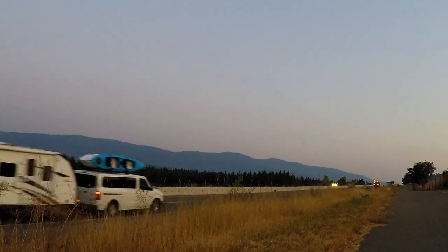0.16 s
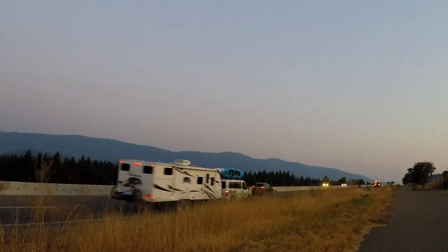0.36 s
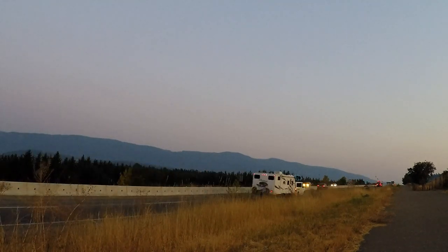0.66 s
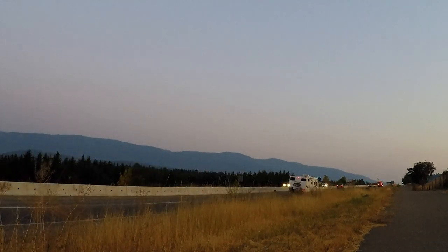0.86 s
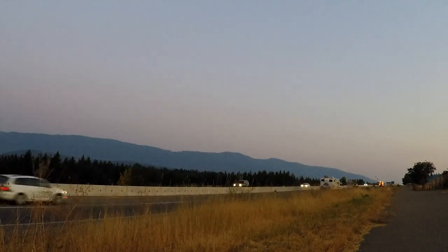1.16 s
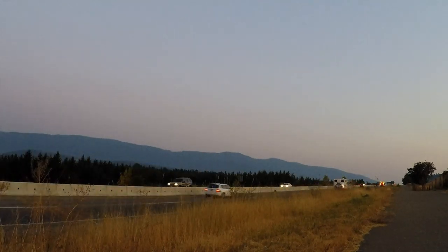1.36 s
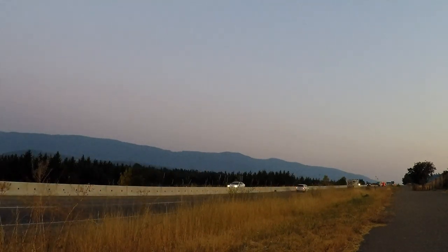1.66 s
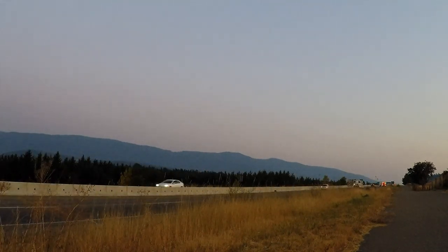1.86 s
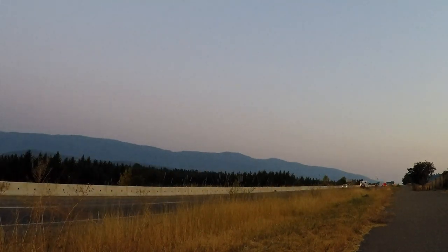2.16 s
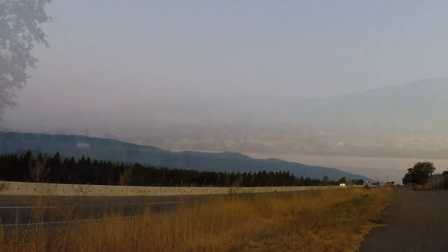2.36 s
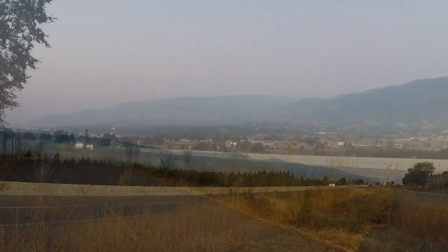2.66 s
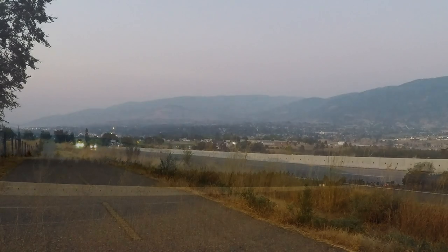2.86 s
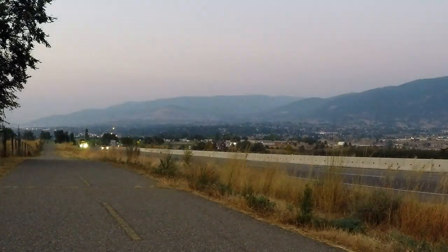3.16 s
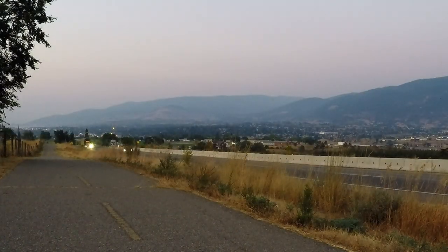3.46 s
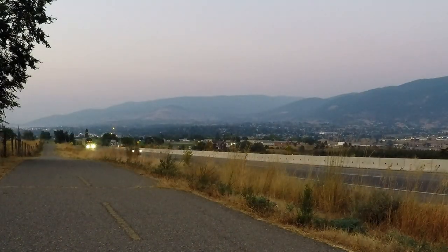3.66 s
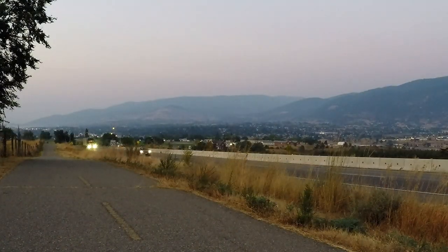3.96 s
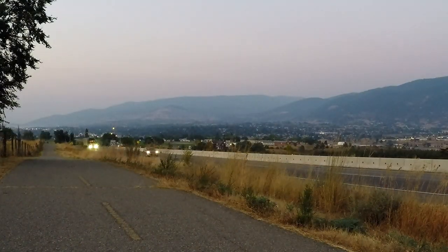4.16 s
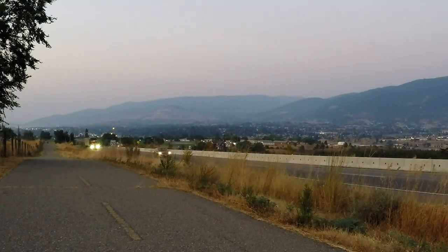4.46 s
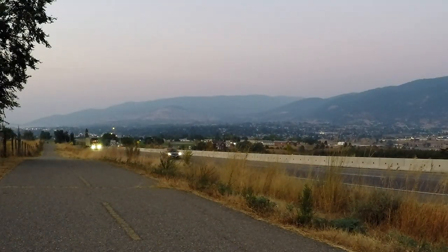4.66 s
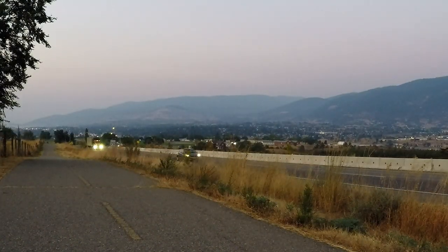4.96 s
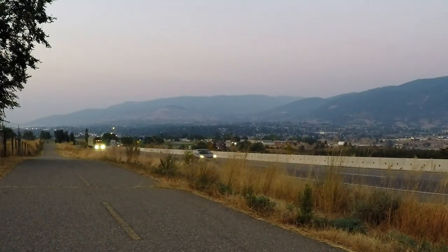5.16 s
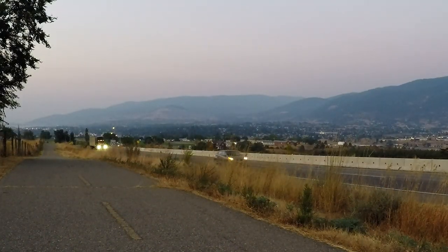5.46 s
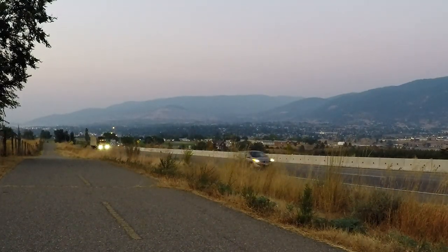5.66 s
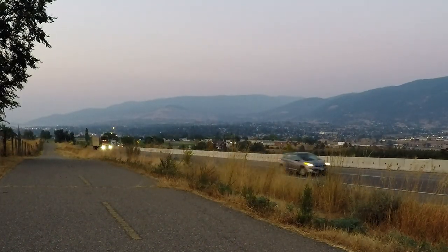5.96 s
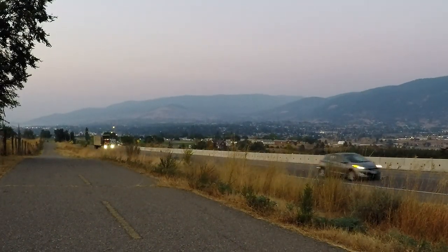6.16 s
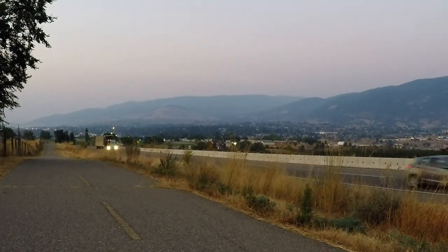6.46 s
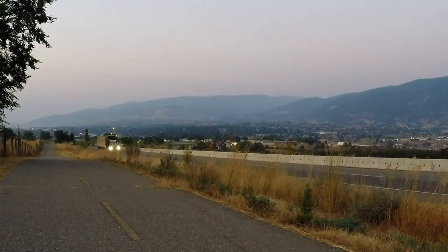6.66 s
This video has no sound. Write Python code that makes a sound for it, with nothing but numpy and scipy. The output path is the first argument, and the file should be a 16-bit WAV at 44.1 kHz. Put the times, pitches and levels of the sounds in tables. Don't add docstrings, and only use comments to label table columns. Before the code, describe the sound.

Close, dry outdoor sound in mono. Dull tyre rumble grows into a large truck and trailer passing, with droning engine orders and irregular bass buffeting that nearly overloads the microphone. One hard stone snap with a weaker bounce stands out. The drone drops in pitch, the truck recedes, and after a quieter gap a lighter car swells in with brighter tyre noise and faint exhaust hum.

```python
import sys
import numpy as np
from scipy import signal
from scipy.fft import rfft, irfft, next_fast_len
from scipy.io import wavfile
from scipy.ndimage import uniform_filter1d, minimum_filter1d

SR = 44100
rng = np.random.default_rng(int(sys.argv[2]) if len(sys.argv) > 2 else 0)


def gain_from_decibels(decibels):
    exponent = np.asarray(decibels, float) / 20
    return 10 ** exponent


def inscribe(sig):
    pcm = np.round(np.clip(np.atleast_2d(sig).T, -1, 1) * 32767)
    wavfile.write(sys.argv[1], SR, pcm.astype(np.int16))


N = 301203
STEP = 64


def rms_one(x):
    return x / np.sqrt(np.mean(x ** 2) + 1e-20)


def in_time(rows, step=1, fade_s=0.45):
    s, *columns = np.transpose(rows)
    t = np.arange(0, N, step) / SR
    rise = np.clip((t - s[0]) / fade_s, 0, 1) if s[0] > 0.1 else 1
    fall = np.clip((s[-1] - t) / fade_s, 0, 1) if s[-1] < N / SR - 0.1 else 1
    return [np.interp(t, s, c) for c in columns] + [np.sqrt(rise * fall) + 0 * t]


def every_sample(slow):
    return np.interp(np.arange(N) / STEP, np.arange(len(slow)), slow)


def drift(rate_hz):
    r = np.exp(-2 * np.pi * rate_hz * STEP / SR)
    noise = rng.standard_normal(N // STEP + 2001)
    return rms_one(signal.lfilter([1], [1, -2 * r, r * r], noise)[2000:])


def at_hz(points, hz):
    points_hz, points_db = np.transpose(points)
    return np.interp(np.log(hz), np.log(points_hz), points_db)


def hump(hz, centre_hz, octaves):
    return np.exp(-0.5 * (np.log2(hz / centre_hz) / octaves) ** 2)


def coloured(points):
    hz = np.maximum(np.arange(N // 2 + 1) * SR / N, 1)
    return rms_one(irfft(rfft(rng.standard_normal(N)) * gain_from_decibels(at_hz(points, hz)), N))


def impulses(rows, lift_db):
    s, db = np.transpose(rows)
    clicks = np.zeros(N)
    clicks[np.round(s * SR).astype(int)] = gain_from_decibels(db + lift_db)
    return clicks


def traffic(patchy_db=0.9, shared_db=0.4):
    # seconds, tyre roar in dB
    nearing_roar = [(0.0, -26.5), (0.7, -26), (1.1, -24), (1.45, -23.5), (1.8, -20), (2.2, -20), (2.6, -18)]
    # seconds, tyre roar in dB, horn resonance in Hz
    passing_roar = [(2.1, -23, 1300), (2.45, -21.5, 1240), (2.72, -17, 1170), (3.05, -17, 1000),
                    (3.4, -19, 789), (3.62, -17.5, 790), (3.9, -20.5, 970), (4.1, -23.5, 1040),
                    (4.4, -29.5, 1140)]
    # seconds, tyre roar in dB, horn resonance in Hz
    car_roar = [(4.0, -24.5, 1310), (4.25, -27.5, 1340), (4.55, -31, 1360), (5.2, -28.5, 1440),
                (5.6, -27, 1274), (6.0, -26.5, 1120), (6.35, -22.3, 1196), (6.83, -20.5, 1290)]
    # Hz, level in dB per Hz
    nearing_colour = [(70, -1), (125, -10.5), (170, -14), (300, -17.5), (450, -18.5), (680, -15),
                      (920, -17.5), (1500, -19), (1950, -28.5), (2300, -37.5), (3200, -46), (4000, -54.5),
                      (5200, -63.5), (9000, -74.5)]
    passing_colour = [(70, -3), (115, -7.5), (150, -8), (240, -7.5), (310, -12), (480, -17), (930, -12),
                      (1550, -13.5), (1900, -22.5), (2300, -33.5), (2700, -32.5), (3600, -39.5),
                      (5500, -54.5), (9000, -67.5)]
    car_colour = [(70, 1), (136, -1.5), (255, -0.5), (350, -4.5), (480, -10.5), (700, -7), (1250, -7),
                  (1700, -11.5), (2200, -18.5), (2700, -21.5), (3050, -26.5), (3600, -27), (5600, -45),
                  (9000, -59.5)]
    # drone in dB per s, hiss in dB per s, share of the roar's swing that
    # the hiss misses, horn lift at mid-way in dB, change of that lift in dB per s
    nearing_trend = (-0.9, 0, 0.6, 7, -2.5)
    passing_trend = (-2.3, 3.0, -0.03, 6, -3.5)
    car_trend = (-2, 3, 0.85, 3.0, -0.3)
    # from
    # s, to s, from Hz, to Hz, change in dB
    echo_dips = [(0.3, 3.2, 710, 580, -7), (4.05, 6.0, 850, 920, -8), (6.0, 7.0, 1560, 1780, -6),
                 (3.55, 4.15, 760, 800, -4), (2.5, 3.0, 4300, 5600, -3.5), (6.2, 6.8, 680, 650, -3)]
    echo_narrow = [(-0.8, 1.4, 3190, 3160, 4.5), (0.9, 1.75, 3950, 3900, -6), (1.7, 2.75, 4700, 4650, 6.5),
                   (2.1, 2.7, 2150, 2150, 3), (4.4, 5.5, 2350, 2150, -4.5), (5.45, 6.3, 2100, 2420, 7.5),
                   (6.2, 7.0, 3250, 3700, 7.5), (6.0, 7.3, 5000, 6600, 5.5), (1.85, 2.7, 3400, 3700, 4.5),
                   (6.0, 6.6, 2600, 2900, 3), (3.2, 5.1, 590, 560, 5)]

    edges = 70 * 2 ** (np.arange(44) / 6)
    hz = np.sqrt(edges[1:] * edges[:-1])[:, None]
    echo_db = ground_echo(echo_narrow, hz, octaves=0.064) + ground_echo(echo_dips, hz, octaves=0.14)
    nearing_rows = [(s, db, 991 - 57 * s) for s, db in nearing_roar]
    power = vehicle(nearing_rows, nearing_trend, nearing_colour, hz)
    power = power + vehicle(passing_roar, passing_trend, passing_colour, hz)
    power = power + vehicle(car_roar, car_trend, car_colour, hz)
    gains = np.sqrt(power * hz) * gain_from_decibels(echo_db)

    white = rng.standard_normal((2, N))
    together = drift(2.2)
    out = np.zeros(N)
    for k, gain in enumerate(gains):
        band_filter = signal.butter(3, edges[k:k + 2], "band", fs=SR, output="sos")
        band = signal.sosfilt(band_filter, white[k % 2])
        flicker_db = patchy_db * drift(3.0) + shared_db * together * np.clip(hz[k] / 3000, 0.2, 1)
        out += rms_one(band) * every_sample(gain * gain_from_decibels(flicker_db[:len(gain)]))
    return out


def vehicle(rows, trend, colour, hz):
    tyre_db, horn_hz, fade = in_time(rows, step=STEP)
    drone_db_per_s, hiss_db_per_s, missed, mid_lift_db, lift_db_per_s = trend
    start_s, end_s = rows[0][0], rows[-1][0]
    rolled_s = np.clip(np.arange(0, N, STEP) / SR, start_s, end_s) - (start_s + end_s) / 2
    drone_db = drone_db_per_s * rolled_s
    hiss_db = hiss_db_per_s * rolled_s - missed * (tyre_db - np.mean(np.array(rows)[:, 1]))
    horn_db = (mid_lift_db + lift_db_per_s * rolled_s) * hump(hz, horn_hz, octaves=0.13)
    low = np.clip(np.log2(700 / hz) / 0.45, 0, 1)
    high = np.clip(np.log2(hz / 1700) / 0.77, 0, 1.4)
    power = gain_from_decibels(at_hz(colour, hz) + low * drone_db + high * hiss_db + horn_db) ** 2
    tyre_band = (hz[:, 0] > 600) & (hz[:, 0] < 2200)
    return power / (power * hz)[tyre_band].sum(0) * (gain_from_decibels(tyre_db) * fade) ** 2


def ground_echo(rows, hz, octaves):
    out = 0
    for from_s, to_s, from_hz, to_hz, db in rows:
        way = np.clip((np.arange(0, N, STEP) / SR - from_s) / (to_s - from_s), 0, 1)
        swell = np.abs(np.sin(np.pi * way)) ** 0.7
        out = out + db * swell * hump(hz, from_hz + (to_hz - from_hz) * way, octaves)
    return out


def engines():
    # seconds, level in dB
    firing_level = [(0, -34), (.92, -26.5), (1.33, -31.5), (1.95, -24.5), (2.5, -34), (3.3, -24.5),
                    (3.57, -16.5), (4.0, -31.5), (4.6, -43)]
    # seconds, pitch in Hz, level in dB
    axle_whine = [(0, 299, -35.5), (1.3, 304, -36.5), (1.9, 299, -43), (2.8, 299.9, -32), (3.5, 297.7, -35)]
    # seconds, pitch in Hz, level in dB
    exhaust_note = [(4.2, 77.3, -36), (5.3, 77.5, -40.5), (5.9, 75.6, -32.5), (6.4, 76.06, -39),
                    (6.83, 78.1, -23)]

    closest_s, sweep_s, doppler_share = 3.35, 0.498, 0.053
    t = np.arange(N) / SR
    past = (t - closest_s) / sweep_s
    firing_hz = 113.64 * (1 - doppler_share * past / np.sqrt(1 + past ** 2))
    firing_db, fade = in_time(firing_level)
    diesel = hum(firing_hz, firing_db, fade, rough=0.25)

    after_top_s = t - 3.64
    tread_db = -20 - np.maximum(-8.5 * after_top_s, 47 * after_top_s)
    tread = hum(2.1 * firing_hz, tread_db - 3, fade, rough=1.3, waver_hz=9)
    axle = hum(*in_time(axle_whine), rough=0.5)
    exhaust = hum(*in_time(exhaust_note), rough=0.25)
    return diesel + tread + axle + exhaust


def trailer():
    # seconds, pitch in Hz, level in dB
    body_drone = [(3.0, 211.5, -32), (3.45, 207.5, -27), (4.0, 204, -42)]
    return hum(*in_time(body_drone), rough=0.8, waver_hz=6)


def hum(hz, db, fade, rough, waver_hz=12.0):
    phase_waver = every_sample(drift(waver_hz))
    height_waver = every_sample(drift(waver_hz))
    phase = 2 * np.pi * np.cumsum(hz) / SR + rough * phase_waver
    return np.sqrt(2) * gain_from_decibels(db) * fade * (1 + 0.5 * rough * height_waver) * np.sin(phase)


def thud(evened=0.6, top=0.97):
    # Hz, level in dB per Hz
    deep_colour = [(12, -21.5), (20, -6), (30, -4.5), (42, 4.5), (52, -4.5), (62, -3), (70, -5.5),
                   (85, -14), (110, -10.5), (150, -25), (240, -75)]
    noise = coloured(deep_colour)
    swell = np.sqrt(uniform_filter1d(noise ** 2, size=2600) + 0.05)
    waves = top * np.tanh(pressure() * rms_one(noise / swell ** evened) / top)
    return signal.sosfilt(signal.butter(2, 160, fs=SR, output="sos"), waves)


def pressure(half_wave_s=0.014):
    # seconds, level in dB
    buffeting = [(0, -25.5), (0.75, -21.5), (1.15, -23), (1.7, -17), (2.02, -22), (2.4, -14), (3.14, -24),
                 (3.5, -11.5), (3.75, -20.5), (4.2, -29.5), (4.6, -35), (6.83, -32)]
    # seconds, level in dB
    wave_hits = [(0.0, -15.5), (0.19, -13.5), (0.53, -37), (0.99, -18.5), (1.29, -17), (1.42, -16.5),
                 (1.58, -7), (1.73, -16), (1.84, -8.5), (1.94, -15), (2.11, -4.5), (2.145, -8), (2.24, -8),
                 (2.275, -5.5), (2.32, -10), (2.64, -7.5), (2.83, -13), (2.91, -6), (3.01, -12),
                 (3.21, -17.5), (3.35, -10.5), (3.56, -11), (4.28, -24), (4.78, -28), (5.38, -23),
                 (5.64, -61), (6.17, -24), (6.47, -19.5), (6.64, -23.5), (6.79, -26)]
    t = np.arange(0, N, STEP) / SR
    power = gain_from_decibels(in_time(buffeting, step=STEP)[0]) ** 2
    for s, db in wave_hits:
        power = power + gain_from_decibels(db) ** 2 * np.exp(-((t - s) / half_wave_s) ** 2)
    return np.interp(np.arange(N) / SR, t, np.sqrt(power))


def stone():
    # seconds, peak in dB
    strikes = [
        (1.82748, -3.2),
        (1.938, -16),
    ]
    # Hz, level in dB, time to fall by 60 dB in seconds
    ring_modes = [
        (1577, 2.5, 0.0052),
        (1230, -20.5, 0.012),
        (2070, -14.5, 0.014),
    ]

    clicks = impulses(strikes, lift_db=2.0)
    out = 0.26 * np.convolve(clicks, np.hanning(130))[:N]
    chatter = np.hanning(80) * np.cos(2 * np.pi * ring_modes[0][0] * np.arange(80) / SR) / 10
    struck = np.convolve(clicks, chatter)[:N] + 1e-18
    for hz, db, t60_s in ring_modes:
        r = gain_from_decibels(-60 / (t60_s * SR))
        w = 2 * np.pi * hz / SR
        out += signal.lfilter([0, gain_from_decibels(db) * np.sin(w)], [1, -2 * r * np.cos(w), r * r], struck)
    return out


def gain_control(x, ceiling=0.8):
    gain = minimum_filter1d(ceiling / np.maximum(np.abs(x), ceiling), size=661)
    return x * uniform_filter1d(uniform_filter1d(gain, size=330), size=330)


def scene():
    road = traffic() + engines() - thud() + trailer()
    return (gain_control(road, ceiling=0.85) + stone())[None]


def housing(x):
    # Hz, width in octaves, change in dB
    cavities = [(3690, 0.054, 0), (3950, 0.056, -2), (5370, 0.14, 1), (6700, .08, -1.5), (7800, .06, -0.5)]
    size = next_fast_len(N + SR // 10)
    hz = np.maximum(np.arange(size // 2 + 1) * SR / size, 1)
    tail_fade = np.clip((size - np.arange(size)) / (size - N), 0, 1)
    mirrored = np.pad(x, [(0, 0), (0, size - N)], "reflect") * tail_fade
    colour_db = sum(db * hump(hz, centre_hz, octaves) for centre_hz, octaves, db in cavities)
    return irfft(rfft(mirrored) * gain_from_decibels(colour_db), size)[:, :N]


def preamp_hiss():
    # Hz, level in dB per Hz
    hiss_colour = [(2940, -21), (5000, -2.5), (5830, -8.5), (9000, -8.5), (12000, -8.5), (14000, -13.5),
                   (15100, -11), (15400, -28)]
    return gain_from_decibels(-65.5) * coloured(hiss_colour)


def thinned_treble(x, from_hz=6000, full_hz=15000, quiet_db=-62, span_db=22):
    hz, _, lines = signal.stft(x, SR, "cosine", nperseg=2048)
    power = np.abs(lines) ** 2
    road_db = 10 * np.log10(power[:, (hz > 2400) & (hz < 6000)].sum(axis=1) + 1e-12)
    busy = np.clip((road_db - quiet_db) / span_db, 0.45, 1)[:, None]
    usual = uniform_filter1d(power, size=41, axis=1)
    whim = np.repeat(gain_from_decibels(4 * rng.standard_normal((33, lines.shape[2]))), 32, axis=0)[:len(hz)]
    bar = 3.2 * busy * np.clip((hz - from_hz) / (full_hz - from_hz), 0, 1)[:, None]
    made_up = np.sqrt(np.exp(bar) / (1 + bar)) ** 1.2
    kept = lines * (power > bar * whim * usual) * made_up
    return signal.istft(kept, SR, "cosine", nperseg=2048)[1][:, :N]


def ticks():
    # seconds, peak in dB
    tick_rows = [(1.6277, -45), (2.4618, -40), (2.6623, -38), (2.829, -38), (2.963, -41), (2.9956, -37),
                 (4.5306, -42)]
    bright = signal.butter(2, [4000, 14500], "band", fs=SR, output="sos")
    return signal.sosfilt(bright, impulses(tick_rows, lift_db=5.5) + 1e-18)


def roll_off(x):
    return signal.sosfilt(signal.butter(12, 15380, fs=SR, output="sos"), x)


def record(dry):
    heard = thinned_treble(housing(dry) + preamp_hiss()) + ticks()
    return roll_off(np.clip(heard, -0.99, 0.99))


dry = scene()
out = record(dry)
inscribe(out)
```